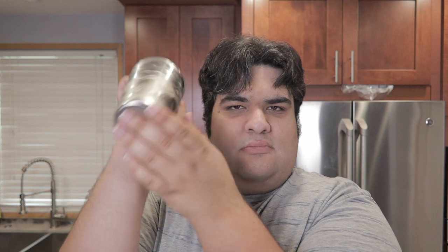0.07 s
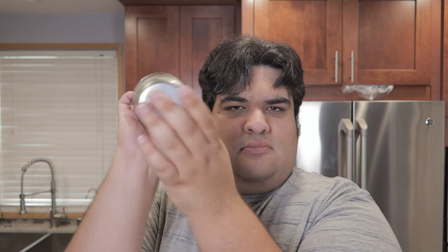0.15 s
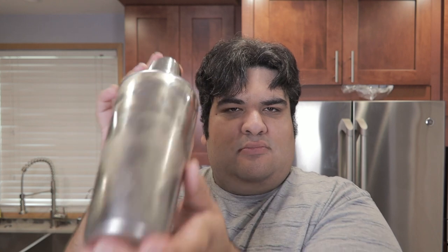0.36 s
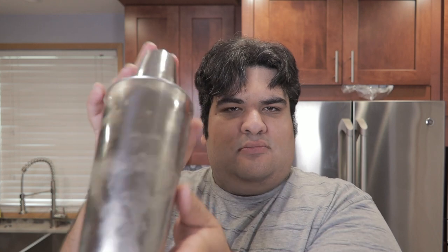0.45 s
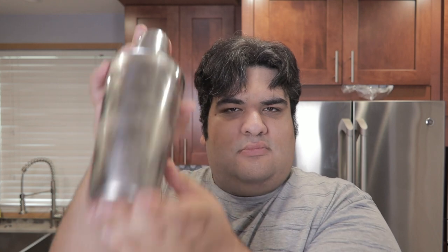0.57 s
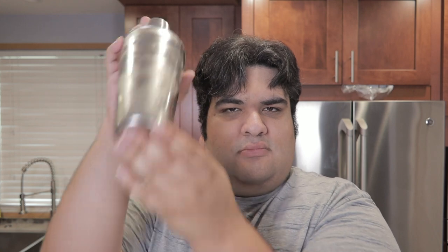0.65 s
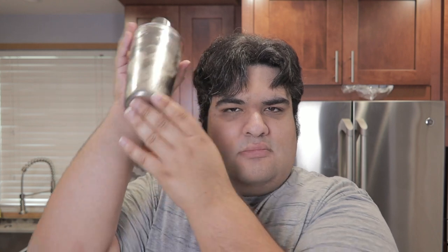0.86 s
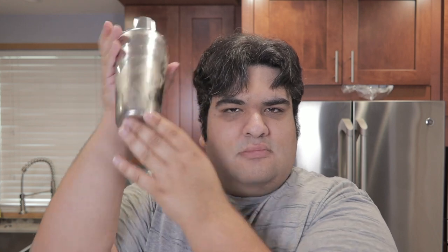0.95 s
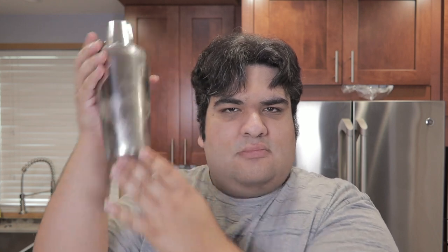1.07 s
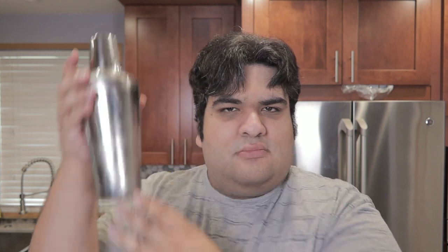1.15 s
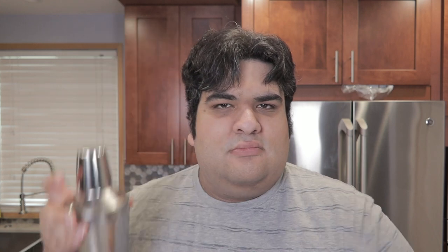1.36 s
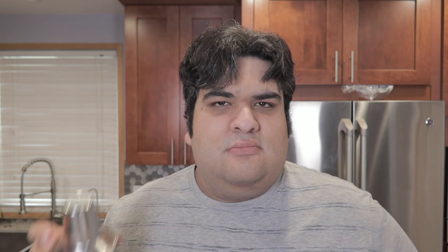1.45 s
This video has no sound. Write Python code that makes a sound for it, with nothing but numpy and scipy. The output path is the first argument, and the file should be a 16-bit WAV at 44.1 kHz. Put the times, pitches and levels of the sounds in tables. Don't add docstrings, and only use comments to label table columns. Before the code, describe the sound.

Ice knocks inside a hand-gripped steel cocktail shaker, very close. The ring of an earlier slam fades under small ticks; at 0.2 s the ice is thrown in a bright clattering burst until 0.3. Two hard, clipped metallic slams crack at 0.46 and 0.5 s, ringing off kitchen walls. Soft clinks settle from 0.8 to 1.1, fainter ones from 1.25 to 1.45, over quiet fridge hum.

```python
import sys
import numpy as np
from scipy import signal
from scipy.fft import rfft, irfft
from scipy.io import wavfile

SR = 44100
rng = np.random.default_rng(int(sys.argv[2]) if len(sys.argv) > 2 else 0)


def decibels_to_gain(level_db):
    exponent = np.asarray(level_db, float) / 20
    return 10 ** exponent


def to_wav(sig):
    pcm = np.clip(np.atleast_2d(sig), -1, 1) * 32767
    pcm = np.round(pcm).astype(np.int16)
    wavfile.write(sys.argv[1], SR, pcm.T)


N = 66150

# hz, level_db
FRIDGE_AIR = [(35, -23.5), (170, -8), (300, -4), (420, -4.5), (700, -14), (1670, -7.5), (4080, -30),
              (16000, -46)]
# pitch_hz, level_db
COMPRESSOR = [(59.2, -81.5), (118.4, -78.5), (236.9, -69.5), (296.1, -69), (355.3, -71), (384, -70)]
# hz, t60_s
KITCHEN_DECAY = [(200, 0.75), (530, 0.39), (1390, 0.5), (2000, 0.56), (4000, 0.58), (7000, 0.45),
                 (11000, 0.32), (16000, 0.49)]
# start_s, level_db, pitch_hz, length_s
PUFFS = [
    (.2, -51.5, 151, 0.041),
    (.25, -62.5, 95, .07),
    (.457, -54, 190, .05),
    (0.549, -59, 124, 0.043),
    (1.212, -64, 120.4, .08),
]
# time_s, level_db
RATTLE_LEVEL = [(0, -36), (.14, -50.5), (0.207, -40.5), (0.213, -25.5), (0.296, -30), (0.349, -40),
                (0.461, -38.5), (.485, -18), (0.519, -42), (.6, -56), (.8, -68), (0.878, -43.5),
                (.95, -57.5), (1.029, -46), (1.12, -64.5), (1.301, -66.5), (1.4, -50), (1.5, -57)]
# hz, level_db
ICE_COLOUR = [(200, -32), (500, -17.5), (1200, 5), (2200, 9), (4200, 19), (5500, 3), (9000, 8.5),
              (16000, -24)]
# start_s, peak_db, pitch_hz
CUBES = [(.062, -32, 920), (.093, -29, 2450), (.148, -27, 2870), (.156, -31, 2960), (.2025, -20.5, 3000),
         (0.212, -20, 2130), (.211, -13, 4400), (0.2162, -9.5, 3130), (0.2168, -21, 398),
         (0.2163, -18, 1250), (0.2227, -15, 3160), (.2245, -21, 2120), (0.2294, -15, 4200),
         (0.2359, -16.5, 2160), (.248, -26, 4120), (.254, -18, 3500), (.265, -24, 1150), (.2775, -22, 880),
         (.28, -19, 4500), (0.286, -19, 4160), (.297, -21, 1960), (.313, -15.5, 4120), (0.326, -20, 3700),
         (.4183, -16, 3710), (0.4641, -11, 3900), (.4632, -12, 2050), (.472, -21, 2030), (0.477, -23, 4200),
         (0.479, -24, 1910), (.486, -18.5, 2030), (0.493, -16.5, 4480), (.497, -14.5, 1976),
         (0.486, -14.5, 3916), (0.4828, -17, 1250), (0.483, -10, 3040), (.4965, -4, 3520),
         (0.4998, -20, 3700), (.504, -22.5, 810), (0.509, -20, 4510), (0.504, -17.5, 4000),
         (.5105, -25.5, 1966), (.7972, -36.5, 2310), (0.7968, -40.5, 1012), (.799, -37, 1710),
         (0.828, -33, 1800), (.8545, -36, 4000), (0.853, -33, 1250), (.871, -30, 2300), (0.875, -35, 980),
         (0.963, -24.5, 3160), (1.016, -26, 1720), (1.021, -29.5, 1680), (1.245, -38, 1780),
         (1.244, -40, 1180), (1.253, -39, 1720), (1.3285, -35, 5680), (1.3272, -41, 3500),
         (1.3288, -36, 1670), (1.341, -33, 1700), (1.34, -36, 4110), (1.392, -31.5, 1430),
         (1.385, -39, 1680), (1.411, -24.5, 2690), (1.41, -34, 1470)]
# start_s, peak_db, low_modes_db, high_modes_db, tick_db
DRIFT_KNOCKS = [
    (0.0626, -22, -6, -12, -17.5),
    (0.0936, -30, -1, -12, -14.5),
    (0.1213, -41.5, -12, -10.5, -3.5),
    (0.1487, -25.5, -3, -5, -18.5),
    (0.1668, -26.5, -5.5, -11.5, -17),
    (0.2015, -18.5, -14.5, -19.5, -15),
]
THROW_KNOCKS = [
    (.2112, -11.5, -5.5, 0.5, -13.5),
    (.2161, -9.5, -10.5, -0.5, -9),
    (.2303, -18, -7, -0.5, -12.5),
    (.2365, -18, -6, -11, -14.5),
    (.2478, -23, -7.5, -11, -8.5),
    (.2575, -15.5, -9, 2.5, -10),
    (.2658, -16.5, -17, -2, -13.5),
    (.2785, -17.5, -3.5, -6, -12.5),
    (.2972, -17, -20.5, -3.5, -4),
    (.3135, -36.5, -11, -13, -26),
]
SLAM_KNOCKS = [(.3757, -19, -10, -1, -19), (.402, -30, -1.5, -13, -9), (.4183, -13, -25, -1, -8),
               (.427, -28.5, -16.5, -7.5, -5), (.4355, -30, -1.5, -13, -18.5), (.4565, -23, -14, -10, -10),
               (.4606, 1.5, -7, -1, -23.5), (.472, -18.5, -1, 0.5, -10.5), (.478, -11, -16.5, 0, -16.5),
               (.4827, -12.5, -14, 4, -9), (.4942, 0, -15.5, 0.9, -19), (.505, -20.5, 2, -13, -30.5),
               (.5115, -21.5, -19, -14, -26)]
SETTLE_KNOCKS = [(.7972, -34.5, -9.5, -3.5, -18.5), (.826, -32, -6.5, -5, -20),
                 (.8352, -33.5, -3.5, -3, -15), (.854, -24.5, -4, -1.5, -22),
                 (.8697, -24.5, -8.5, -1, -12.5), (.874, -25.5, 0.5, -21, -21.5),
                 (.888, -31.5, 2, -10, -25), (.9634, -21.5, -1, -2.5, -18), (.9925, -32, -12, -8, -9),
                 (1.001, -26, -3, 0.5, -16), (1.009, -31, -4, -5, -22), (1.016, -19.5, -8.5, -3, -41),
                 (1.022, -24.5, -2.5, -1, -14.5), (1.0275, -31.5, 5.5, -5, -29),
                 (1.083, -38, 1.5, -17, -27), (1.103, -41, 1, -2, -24.5)]
REST_KNOCKS = [
    (1.2425, -39.5, -0.5, -6, -22),
    (1.3288, -31.5, -3.5, 0, -9.5),
    (1.339, -32.5, -5.5, -2, -17),
    (1.383, -30, -9, -8, -23),
    (1.393, -34.5, 0.5, -27, -25),
    (1.398, -36, -8, 2, -14),
    (1.411, -25.5, -2, 1, -19.5),
    (1.425, -36, 5, -21, -22),
    (1.4465, -45, -2, -9, -20),
    (1.458, -34.5, 3, -5.5, -14.5),
]
# pitch_hz, width_hz, level_db
DRIFT_SHELL = [(604, 470, -20.5), (1180, 720, -11), (1900, 600, -10), (3130, 680, -13), (3650, 490, 2),
               (3900, 400, -19.5), (6940, 1200, -5)]
THROW_SHELL = [(430, 167, -8.5), (875, 140, -6), (1250, 160, -6.5), (2300, 480, 9), (3255, 390, -3),
               (3740, 540, -18), (3910, 860, -1.5), (7030, 1850, 10), (8500, 560, -24)]
SLAM_SHELL = [(592, 230, -26), (778, 120, -27), (1250, 180, -33.5), (2020, 144, -11.5), (3370, 190, -14),
              (4001, 193, -4), (4133, 204, -8.5), (4246, 280, -11), (4900, 970, -22), (6770, 400, -9.5),
              (7820, 610, -11.5)]
SETTLE_SHELL = [(487, 110, -12.5), (1037, 220, -1.5), (1660, 450, 4), (2050, 410, -5), (2934, 280, -2.5),
                (3760, 530, 2), (5690, 530, -9.5), (7670, 480, -13.5)]
REST_SHELL = [(518, 290, -16.5), (1215, 810, -5), (1750, 740, 1), (2690, 590, 2.5), (3810, 270, -4.5),
              (5630, 410, -17), (7000, 280, -15.5)]

AIR_DB = -59
WET_DB, EARLY_DB, GAP_S = -10, -16, 0.0016
RATTLE_PER_S, RATTLE_SPREAD_DB = 3000, 3
CUBE_WIDTH_HZ, CUBE_LOSS, CUBE_RISE_S = 100, 0.04, 0.00051
SPLIT_HZ = 2600
CONTACT_S, RISE_S, SCATTER_DB = 0.016, 0.00026, 1.5
DETUNE, GRIPPED_DETUNE = 0.05, 0.004
TICK_DB, TICK_S, TICK_HZ, TICK_TOP_HZ = 6, 0.0023, 4870, 9730
EARLIER_S, EARLIER_DB = 0.025, -1.5
SHELL_LOW_CUT_HZ = 364
SIDE_HZ, SIDE_Q, SIDE_DB = 4410, 11, -3.5
WALL_HZ = 13700
EDGE_HZ, COUPLING_HZ = 15600, 200


def evened(x):
    return x / np.sqrt(np.mean(x ** 2) + 1e-20)


def read(points, hz):
    f, value = np.transpose(points)
    return np.interp(np.log(hz + 1), np.log(f + 1), value)


def add(mix, start_s, sound):
    part = mix[round(start_s * SR):][:len(sound)]
    part += sound[:len(part)]


def fridge():
    air = rfft(rng.standard_normal(N)) * decibels_to_gain(read(FRIDGE_AIR, np.fft.rfftfreq(N, 1 / SR)))
    t = np.arange(N) / SR
    tones = np.zeros(N)
    for hz, rms_db in COMPRESSOR:
        tones += decibels_to_gain(rms_db) * np.sqrt(2) * np.sin(2 * np.pi * (hz * t + rng.random()))
    return decibels_to_gain(AIR_DB) * evened(irfft(air, N)) + tones


def kitchen(x):
    out, t = np.zeros(len(x)), np.arange(len(x)) / SR
    for k in range(3):
        taps = np.zeros(SR)
        slots = np.arange(0, SR - 20, 12)
        at = slots + rng.integers(0, 12, len(slots))
        taps[at] = rng.choice([-1., 1.], len(at))
        hz, age_s, bands = signal.stft(taps, SR, nperseg=256)
        decay = decibels_to_gain(-60 * age_s / read(KITCHEN_DECAY, hz)[:, None])
        tail = signal.istft(bands * decay, SR, nperseg=256)[1][:SR]
        tail = tail * np.clip(np.arange(SR) / SR / GAP_S - 0.5, 0, 1)
        tail = decibels_to_gain(WET_DB) * tail / np.linalg.norm(tail)
        tail[rng.integers(60, 900, 6)] += decibels_to_gain(EARLY_DB) * rng.uniform(-1.12, 1, 6)
        turn = np.sqrt(2 / 3) * np.cos(2 * np.pi * (5 * t + k / 3))
        out += signal.fftconvolve(x * turn, tail)[:len(x)]
    return out


def puff(level_db, hz, length_s):
    t = np.arange(0, length_s, 1 / SR)
    swell = np.sin(np.pi * t / length_s) ** 2
    return decibels_to_gain(level_db) * swell * np.sin(2 * np.pi * hz * t)


def rattle():
    size = decibels_to_gain(RATTLE_SPREAD_DB * np.minimum(rng.exponential(1, N), 3))
    size = size * (rng.random(N) < RATTLE_PER_S / SR)
    kind, t, out = rng.integers(0, 8, N), np.arange(500) / SR, np.zeros(N)
    pitches = np.geomspace(300, 15000, num=40)
    for k in range(8):
        hz = pitches[k::8, None] * rng.uniform(0.95, 1.05, (5, 1))
        decay = np.exp(-np.pi * (250 + 0.14 * hz) * t)
        tone = np.sin(2 * np.pi * (hz * t + rng.random((5, 1))))
        click = decibels_to_gain(read(ICE_COLOUR, hz)) * decay * tone * np.minimum(t / 0.00017, 1)
        out += signal.oaconvolve(size * (kind == k), click.sum(0))[:N]
    level_db = np.interp(np.arange(N) / SR, *np.transpose(RATTLE_LEVEL))
    return evened(out) * decibels_to_gain(level_db)


def clack(peak_db, hz):
    t = np.arange(1400) / SR
    decay = np.exp(-np.pi * (CUBE_WIDTH_HZ + CUBE_LOSS * hz) * t)
    return decibels_to_gain(peak_db) * decay * np.sin(2 * np.pi * hz * t) * np.minimum(t / CUBE_RISE_S, 1)


def knock(shell, detune, peak_db, low_db, high_db, tick_db):
    t = np.arange(1400) / SR
    hz, width_hz, mode_db = np.transpose(shell)[:, :, None]
    louder, sharper, phase = rng.uniform(-0.97, 1, (3, len(shell), 1))
    decay = decibels_to_gain(mode_db + SCATTER_DB * louder) * np.exp(-np.pi * width_hz * t)
    modes = decay * np.sin(2 * np.pi * hz * (1 + detune * sharper) * t + np.pi * phase)
    modes = modes * (1 - np.exp(-(t / RISE_S) ** 2))
    contacts = rng.standard_normal(200) * (rng.random(200) < 0.07)
    contacts = contacts * 6 * detune * np.exp(-t[:200] / CONTACT_S)
    contacts[0] = 1
    modes = signal.fftconvolve(modes, contacts[None], axes=1)[:, :len(t)]
    low = modes[hz[:, 0] < SPLIT_HZ].sum(0)
    high = modes[hz[:, 0] > SPLIT_HZ].sum(0)
    ring = decibels_to_gain(low_db) * low / abs(low).max() + decibels_to_gain(high_db) * high / abs(high).max()
    hiss = rng.standard_normal(len(t)) * np.exp(-t / TICK_S) * np.minimum(t / 0.000099, 1)
    tick = signal.lfilter(*signal.butter(2, TICK_HZ, "high", fs=SR), hiss)
    tick = signal.lfilter(*signal.butter(1, TICK_TOP_HZ, fs=SR), tick)
    return decibels_to_gain(peak_db) * (ring + decibels_to_gain(tick_db + TICK_DB) * tick)


def scene():
    lead = SR // 5
    lead_s = lead / SR
    shaker = np.concatenate([np.zeros(lead), rattle()])
    earlier = knock(DRIFT_SHELL, GRIPPED_DETUNE, EARLIER_DB, -13.5, 0.82, -19.0)
    add(shaker, lead_s - EARLIER_S, earlier)
    strokes = ((DRIFT_KNOCKS, DRIFT_SHELL, DETUNE), (THROW_KNOCKS, THROW_SHELL, DETUNE),
               (SLAM_KNOCKS, SLAM_SHELL, GRIPPED_DETUNE), (SETTLE_KNOCKS, SETTLE_SHELL, DETUNE),
               (REST_KNOCKS, REST_SHELL, DETUNE))
    for knocks, shell, detune in strokes:
        for start_s, *levels in knocks:
            add(shaker, start_s + lead_s, knock(shell, detune, *levels))
    for start_s, *cube in CUBES:
        add(shaker, start_s + lead_s, clack(*cube))
    low_cut = signal.butter(4, SHELL_LOW_CUT_HZ, "high", fs=SR, output="sos")
    shaker = signal.sosfilt(low_cut, shaker)
    for start_s, *swing in PUFFS:
        add(shaker, start_s + lead_s, puff(*swing))
    beam = signal.lfilter(*signal.iirpeak(SIDE_HZ, SIDE_Q, fs=SR), shaker)
    sideways = shaker + decibels_to_gain(SIDE_DB) * beam
    to_walls = signal.lfilter(*signal.butter(1, WALL_HZ, fs=SR), sideways)
    room = (shaker + kitchen(to_walls))[lead:]
    return (room + fridge())[None]


def band_limit(x):
    return signal.sosfilt(signal.butter(12, 16490, fs=SR, output="sos"), x)


def record(dry):
    cut = signal.oaconvolve(dry, signal.firwin(101, EDGE_HZ, fs=SR)[None], "same")
    overload = np.clip(cut, -1, 1) - cut
    coupling = signal.butter(2, COUPLING_HZ, "high", fs=SR, output="sos")
    held = cut + signal.sosfilt(coupling, overload)
    return band_limit(np.clip(held, -1, 1))


dry = scene()
out = record(dry)
to_wav(out)
```